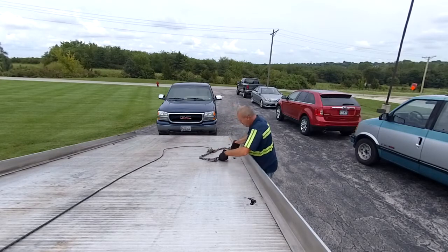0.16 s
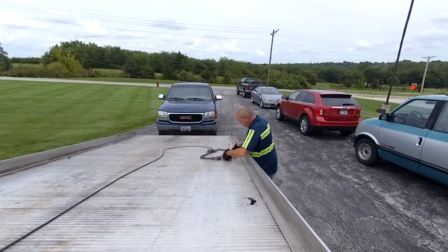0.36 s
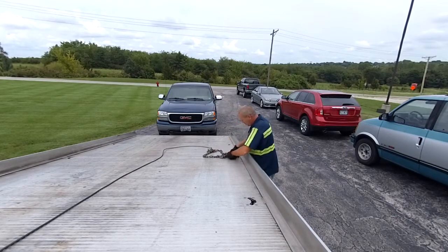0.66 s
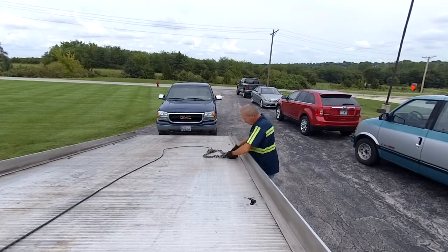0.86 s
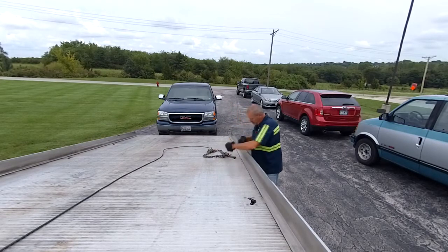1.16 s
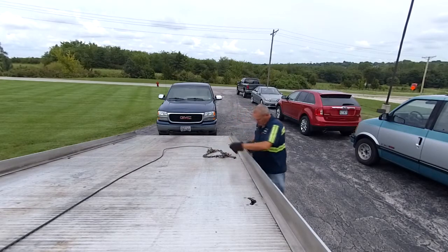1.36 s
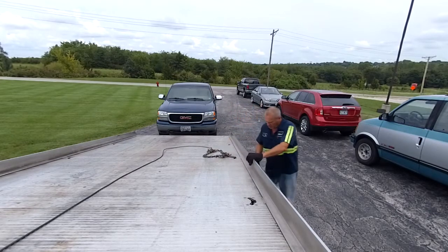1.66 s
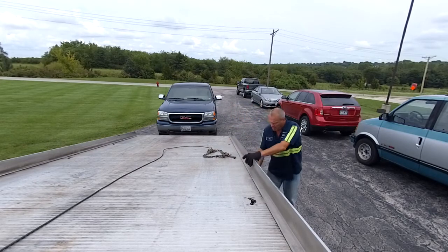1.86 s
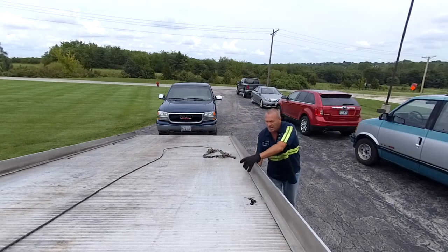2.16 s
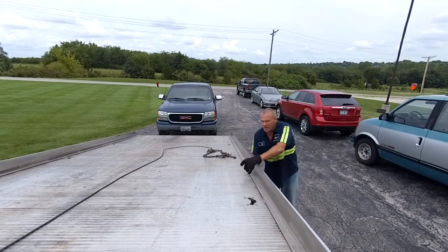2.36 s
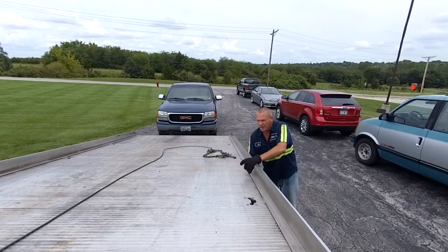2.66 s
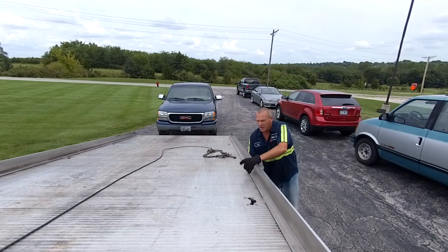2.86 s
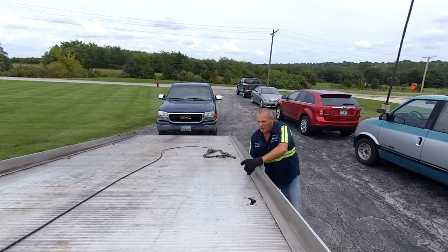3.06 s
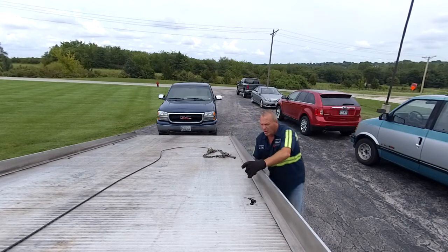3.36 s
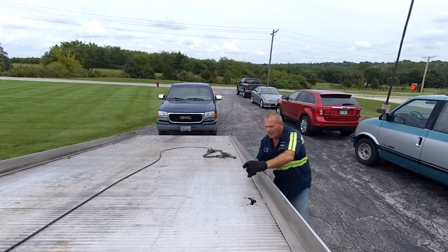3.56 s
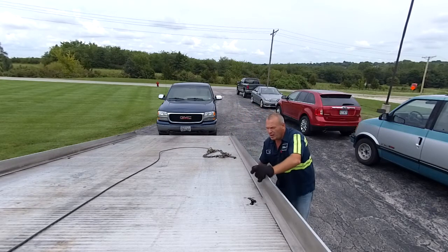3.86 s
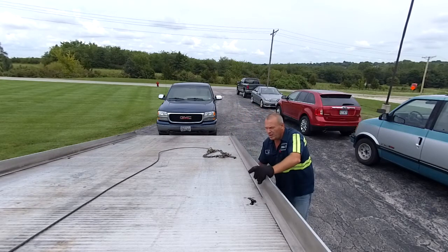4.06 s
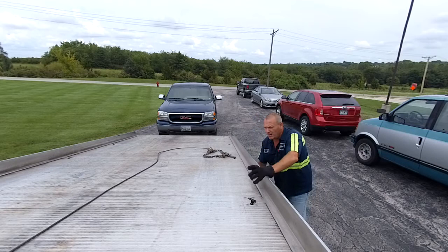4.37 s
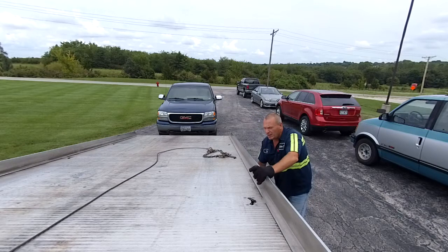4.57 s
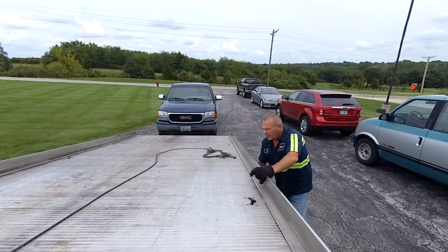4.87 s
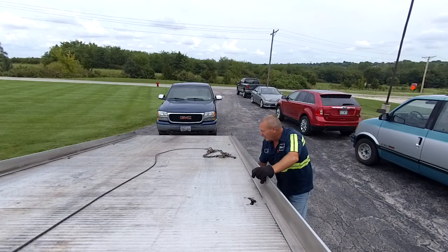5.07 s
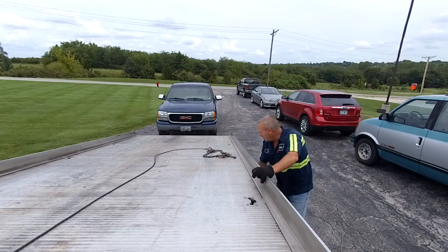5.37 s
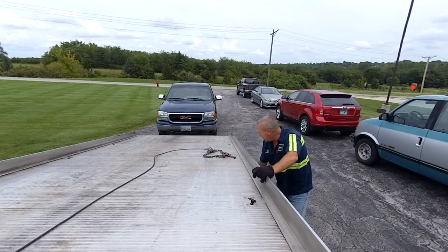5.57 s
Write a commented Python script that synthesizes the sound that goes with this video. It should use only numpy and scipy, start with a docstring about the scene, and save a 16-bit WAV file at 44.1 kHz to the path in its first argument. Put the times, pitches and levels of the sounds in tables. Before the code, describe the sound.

Chain links rattle and knock on a flatbed over a faint engine idle, before a winch pump kicks in, sags, recovers and howls harder.

```python
"""At the head of a flatbed truck's metal deck, a tow chain is dragged and dropped while the engine idles:
random contacts and single blows ring through noise-built plates, and a free link chimes on sine tones.
Soft scuffs and knocks follow beside the truck. At 2.5 s the hydraulic winch is switched in: the pump sags,
picks up speed and whines in shaft-locked tones over shaped noise for rushing oil.
From 4.1 s the cable pulls in two steps: the oil grows louder and many of the tones sing out."""
import sys
import numpy as np
from scipy import signal
from scipy.fft import rfft, irfft, next_fast_len
from scipy.io import wavfile
from scipy.ndimage import uniform_filter1d, map_coordinates

SR = 44100
rng = np.random.default_rng(int(sys.argv[2]) if len(sys.argv) > 2 else 0)


def put_to_file(sound):
    """Save the sound as 16-bit audio at rate SR, in the file named by the first command-line argument."""
    columns = np.atleast_2d(sound).T  # one column per channel
    safe = np.clip(columns, -1, 1)
    whole_steps = np.round(safe * 32767)
    wavfile.write(sys.argv[1], SR, whole_steps.astype(np.int16))


N = 251811
TIME = np.arange(N) / SR

# Links falling on the deck. Each row: time in seconds, relative knock level in dB, relative clash level in dB.
LINK_DROPS = [(.029, -47, -39), (.127, -47, -46), (.230, -32, -46), (.249, -35, -46), (.273, -35, -33.5),
              (.365, -31.5, -36), (.5, -24, -33.5), (.523, -24.5, -30), (.614, -32, -44), (0.687, -52, -39),
              (.762, -27.5, -34), (0.817, -55, -46), (.875, -42.5, -44), (1.119, -53, -47.5)]
# Tone of the struck deck. Each row: frequency in Hz, relative level in dB per Hz.
DECK_SPECTRUM = [(59, -70), (100, -49), (157, -17), (209, -19), (260, -24.5), (460, -17.5), (680, -12),
                 (830, -6), (1000, -3), (1250, -2.5), (1600, -6.5), (2600, -18), (3400, -49), (5700, -120)]
# The deck's strongest modes. Each row: frequency in Hz, width in Hz, lift in dB.
DECK_RESONANCES = [(205, 30, 6), (820, 34, 9), (907, 30, 9), (962, 30, 8), (1060, 26, 4), (1182, 30, 7),
                   (1240, 30, 7), (1395, 28, 4)]
# Tone of the rattling steel links. Each row: frequency in Hz, relative level in dB per Hz.
LINK_SPECTRUM = [(1180, -23), (2000, -13), (2690, -0.5), (2920, 2.5), (3760, -7.5), (4610, -6),
                 (5010, -13.5), (5640, -9), (6730, -17.5), (7080, -15), (7640, -13), (9360, -24.5),
                 (15000, -31)]
# The links' strongest modes. Each row: frequency in Hz, width in Hz, lift in dB.
LINK_RESONANCES = [(3110, 65, -3), (3326, 48, 10.5), (4020, 92, 8), (4530, 160, 4.5), (5480, 140, 4.5)]
BOUNCE_S, BOUNCE_LOSS_DB = 0.018, 7.5  # each falling link bounces once: delay, drop in level
KNOCK_LIFT_DB, CLASH_LIFT_DB = 13, 14.5  # added to the plate rings of each fall
JERK_DB = 1.44  # unevenness of a haul


def chain():
    """Sliding links patter on the deck, falling ones strike it and bounce; deck and steel both ring."""
    hollow_gain, scrape_gain, link_gain = hauling() * amp(JERK_DB * wobble(30))
    deck_patter = patter(DECK_SPECTRUM, DECK_RESONANCES, rate=500, t60=0.19)
    hollow, scrape = split(deck_patter, hz=1100)
    rattle = patter(LINK_SPECTRUM, LINK_RESONANCES, rate=220, t60=0.11)
    dragging = hollow_gain * hollow + scrape_gain * scrape + link_gain * rattle

    falls = np.zeros(N + SR)
    for start, knock_db, clash_db in LINK_DROPS:
        for at, loss_db in ((start, 0), (start + BOUNCE_S, BOUNCE_LOSS_DB)):
            deck_ring = amp(KNOCK_LIFT_DB) * plate(DECK_SPECTRUM, DECK_RESONANCES, t60=0.3, crack_db=2)
            knock = amp(knock_db) * (deck_ring + deck_note())
            link_ring = plate(LINK_SPECTRUM, LINK_RESONANCES, t60=0.091, crack_db=2)
            clash = amp(clash_db + CLASH_LIFT_DB) * link_ring
            falls[round(max(at, 0) * SR):][:len(knock)] += amp(-loss_db) * (knock + clash)
    return dragging + falls[:N]


# Hauls on the chain. Each row: start in seconds, end in seconds, then the levels in dB of
# hollow ring, scrape and links, before the jerks.
CHAIN_HAULS = [(-.05, 0.053, -54, -51, -56), (.125, 0.217, -55.5, -52.5, -54.5),
               (0.218, 0.497, -47.5, -43, -46.5), (0.486, 0.599, -46, -45, -47),
               (0.744, 0.846, -48.5, -51, -56.5)]
HAUL_ATTACK_S, SETTLE_DB_PER_S = 0.012, 57.5


def hauling():
    """Gains of hollow ring, scrape and links: each haul rises fast, holds, then the links settle."""
    gains = []
    for start, end, *levels in CHAIN_HAULS:
        settling_db = SETTLE_DB_PER_S * np.maximum(TIME - end, 0)
        level_db = np.array(levels)[:, None] - settling_db
        gains.append(amp(level_db) * ramp(start, HAUL_ATTACK_S))
    return np.max(gains, axis=0)


NOTE_HZ, NOTE_DB, NOTE_T60 = 967.6, -12, 0.58  # pitch, level against the knock, t60 in seconds


def deck_note():
    """The deck's longest-lived mode hangs on after one knock as a decaying sine."""
    t = np.arange(SR // 2) / SR
    envelope = amp(NOTE_DB - 60 * t / NOTE_T60) * (1 - np.exp(-t / 0.008))
    return envelope * np.sin(2 * np.pi * (NOTE_HZ * t + rng.random()))


def patter(spectrum, modes, rate, t60):
    """Dense contacts at four places, each ringing in its own way, held at an even rms of 1."""
    x = sum(ring(taps(rate, spread_db=3), plate(spectrum, modes, t60, crack_db=3.5)) for _ in range(4))
    local_power = np.abs(uniform_filter1d(x * x, size=1800))
    return x / np.sqrt(local_power + 1e-12)


# Link striking link. Each row: time in seconds, relative level in dB, ring in Hz, t60 in seconds.
LINK_CLINKS = [(.026, -52, 8050, .2), (.137, -51.5, 8150, .08), (.195, -51, 7400, .16),
               (.299, -51, 8150, .12), (.369, -39.5, 7370, 0.57), (.53, -43.5, 8020, .14),
               (.616, -40, 5830, 0.066), (.69, -43, 7540, 0.07)]


def clinks():
    """A free link rings at one high pitch while its neighbours chatter around it."""
    out, t = np.zeros(N + SR), np.arange(SR // 2) / SR
    for start, db, hz, t60 in LINK_CLINKS:
        tone = np.sin(2 * np.pi * hz * t) * amp(-60 * t / t60)
        noise = rng.standard_normal(len(t))
        chatter = unit(filtered(noise, lambda f: 1 / (1 + ((f - hz) / 280) ** 4)))
        sound = 0.68 * tone + 0.22 * chatter * amp(-60 * t / 0.062)
        attack = 1 - np.exp(-t / 0.00056)
        out[round(max(start, 0) * SR):][:len(t)] += amp(db) * sound * attack
    return out[:N]


STROKES = 6  # pump strokes per turn of the shaft
FREE_S, FREE_FADE_S = 2.82, 0.088  # the drum runs free and the surge of pressure fades


def winch():
    """One shaft drives both the whine and the spurts of oil."""
    stroke_hz = pump_speed()
    shaft_turns = np.cumsum(stroke_hz) / SR / STROKES
    surge = 1 - ramp(FREE_S, FREE_FADE_S)
    return whine(stroke_hz, shaft_turns, surge) + oil(shaft_turns, surge)


# Pump and gear tones. Each key: multiple of the shaft speed;
# each value: relative level in dB with slack cable, relative level in dB under load.
SHAFT_ORDERS = {6: (-75.5, -77.5), 12: (-73.5, -74), 13: (-78, -74.5), 26: (-74, -78), 36: (-66, -70),
                42: (-59.5, -57), 48: (-61, -56), 54: (-65, -53.5), 62: (-61, -56), 66: (-68, -61),
                72: (-73, -46.5), 78: (-51, -45.5), 84: (-54, -60), 90: (-57, -39.3), 96: (-64, -66),
                99: (-62, -44), 102: (-67, -61), 104: (-56, -49.5), 120: (-54, -58), 132: (-58, -63),
                134: (-65, -52.5), 162: (-58, -64), 168: (-61, -63), 174: (-60, -51), 192: (-68, -65),
                204: (-62, -64), 336: (-73, -65), 378: (-70, -62)}
# Housing resonances that the tones glide through. Each row: frequency in Hz, width in Hz, lift in dB.
HOUSING_RESONANCES = [(195, 9, 6), (205, 20, 5.5), (438, 16, 4), (722, 14, 10), (818, 26, 11),
                      (1415, 25, 4), (1688, 45, 5), (2075, 65, 4), (2228, 30, 8), (2295, 22, 7),
                      (3084, 30, 8), (3330, 70, 13), (3465, 70, 9)]
WHINE_DB, WHINE_LOAD_DB, WHINE_ATTACK_S = 1.5, -1.66, 0.12  # lift of all tones, its change under load
MESH_ORDER = 90  # the gear mesh howls through the surge: multiple of the shaft speed
SURGE_MESH_DB, SURGE_TONES_DB = 11, -4  # changes in the surge: mesh tone, all other tones


def whine(stroke_hz, shaft_turns, surge):
    """Tones follow the shaft, swell at housing resonances and shift with load; the surge makes them ragged."""
    load = cable_load(0)
    grid = np.arange(0, SR // 2, 2)
    housing_db = bumps_db(HOUSING_RESONANCES, grid)
    out = np.zeros(N)
    for order, (slack_db, loaded_db) in SHAFT_ORDERS.items():
        hz = order * stroke_hz / STROKES
        surge_db = SURGE_MESH_DB if order == MESH_ORDER else SURGE_TONES_DB
        db = slack_db + load * (loaded_db - slack_db)
        db = db + surge * surge_db + np.interp(hz, grid, housing_db)
        phase_jitter = (0.13 + 0.8 * surge) * wobble(70)
        phase = 2 * np.pi * (order * shaft_turns + rng.random()) + phase_jitter
        flicker_db = wobble(7) + (1.1 + 1.5 * surge) * wobble(45)
        out += amp(db + flicker_db) * np.sin(phase)
    overall = amp(WHINE_DB + WHINE_LOAD_DB * load) * ramp(ENGAGE_S, WHINE_ATTACK_S)
    return np.sqrt(2) * out * overall


# Oil in the valve; the rows are growl, rush and hiss. Each row: opening in seconds, attack in seconds,
# level in dB with slack cable, added dB under load, added dB in the surge, lag behind the load in seconds.
OIL_LAYERS = [(2.47, 0.086, -49.5, 5, 7.5, .04), (2.455, 0.12, -43.5, 1.8, 3.5, 0.074),
              (2.45, 0.19, -50, 3.5, 4.5, 0.096)]
# Tone of growl and rush together. Each row: frequency in Hz, relative level in dB per Hz.
RUSH_SPECTRUM = [(30, -58), (150, -36), (400, -28), (580, -28), (780, -6), (1350, 1), (1550, -2.5),
                 (2250, -4), (2600, -4.5), (2900, -8), (3350, -2.5), (3750, -11.5), (4050, -5), (4700, -45)]
# Tone of the hiss. Each row: frequency in Hz, relative level in dB per Hz.
HISS_SPECTRUM = [(3600, -67), (4300, -2), (4750, -1.5), (5150, -4), (6000, -2.5), (6750, 1), (7200, -8),
                 (7700, -3), (9200, -12.5), (11200, -8.5), (12000, -11), (12700, -9), (13700, -22),
                 (15500, -29)]


def oil(shaft_turns, surge):
    """Oil rushes in spurts, one a stroke and alternately strong and weak; more pressure makes it louder."""
    gains = []
    for opens, attack, slack_db, load_db, surge_db, lag in OIL_LAYERS:
        level_db = slack_db + load_db * cable_load(lag) + surge_db * surge
        gains.append(ramp(opens, attack) ** 2 * amp(level_db))
    growl_gain, rush_gain, hiss_gain = gains
    stroke = 2 * np.pi * STROKES * shaft_turns
    spurts = 1 + 0.13 * np.cos(stroke) + 0.092 * np.cos(stroke / 2)
    growl, rush = split(piped(spurts * rng.standard_normal(N), RUSH_SPECTRUM), hz=1172)
    hiss = piped(spurts * taps(rate=8000, spread_db=2.0), HISS_SPECTRUM)
    growl = amp(0.76 * wobble(16)) * growl
    hiss = amp(0.13 * wobble(16)) * hiss
    return growl_gain * growl + rush_gain * rush + hiss_gain * hiss


# Pipe resonances that the oil keeps ringing. Each row: frequency in Hz, width in Hz, lift in dB.
PIPE_RESONANCES = [(1122, 16, 5), (1305, 31, 2.5), (1445, 40, -3.5), (1737, 85, 4.5), (1796, 26, 9.5),
                   (2300, 110, 3.5), (3066, 57, 7), (3356, 78, 4), (3803, 37, -1), (6110, 40, 7),
                   (6800, 53, 10.5), (8240, 60, -5), (11140, 380, 5)]


def piped(x, spectrum):
    """Flow noise through the pipe resonances, with a faint ring of the truck's steel."""
    nearly_flat = [(20, 0), (20000, 0.0046)]
    steel = ring(x, plate(nearly_flat, [], t60=0.14, crack_db=-3.5))
    flow = x + 0.5 * steel
    return coloured(filtered(flow, lambda hz: amp(bumps_db(PIPE_RESONANCES, hz))), spectrum)


# The winch is switched in; the pump's stroke rate then sags from its start.
ENGAGE_S, START_HZ, SAG_HZ_PER_S = 2.5, 118.9, 39
# The engine stumbles at the bottom of the sag: time, width, depth.
STUMBLE_S, STUMBLE_WIDTH_S, STUMBLE_HZ = 2.925, 0.03, 5
# The governor catches it and eases it from the low rate towards the running rate.
CATCH_S, LOW_HZ, RUN_HZ, RECOVER_S, RECOVER_SHAPE = 3.01, 100.65, 107.7, 1.0, 1.25


def pump_speed():
    """Strokes a second: the rate sags as the pump engages, stumbles, then creeps towards its running value."""
    sag = START_HZ - SAG_HZ_PER_S * np.maximum(TIME - ENGAGE_S, 0)
    stumble = STUMBLE_HZ * np.exp(-0.5 * ((TIME - STUMBLE_S) / STUMBLE_WIDTH_S) ** 2)
    shortfall = np.exp(-(np.maximum(TIME - CATCH_S, 0) / RECOVER_S) ** RECOVER_SHAPE)
    recovery = RUN_HZ - (RUN_HZ - LOW_HZ) * shortfall
    return np.maximum(sag, recovery) - stumble


# The cable takes up its slack, then pulls. Each row: start in seconds, rise in seconds, added load from 0 to 1.
CABLE_PULLS = [(4.1, 0.13, 0.27), (4.785, 0.093, 0.72)]


def cable_load(lag):
    """Pull of the cable, 0-1, as felt lag seconds later."""
    return sum(share * ramp(start + lag, rise) for start, rise, share in CABLE_PULLS)


# Dull knocks and steps beside the truck. Each row: centre in seconds, level in dB, length in seconds.
STEP_EVENTS = [(0.995, -61, .014), (1.253, -72, 0.04), (1.567, -76.5, 0.12), (2.17, -75.5, .04),
               (2.982, -64.5, 0.054), (4.86, -61.5, 0.053)]
# Their low tone. Each row: frequency in Hz, relative level in dB per Hz.
THUD_SPECTRUM = [(40, -26), (130, -11), (220, -6), (550, 2.5), (900, -4), (2000, -60)]


def steps():
    """Soft, low scuffs and knocks: shaped noise under bell-shaped swells."""
    level = sum(amp(db) * np.exp(-0.5 * ((TIME - centre) / length) ** 2)
                for centre, db, length in STEP_EVENTS)
    return level * coloured(rng.standard_normal(N), THUD_SPECTRUM)


# Tone of the engine's rush. Each row: frequency in Hz, relative level in dB per Hz.
IDLE_SPECTRUM = [(15, -78), (25, -48), (228, -23.5), (298, -23.5), (471, -25.5), (511, -15), (725, -13.5),
                 (876, -6.5), (976, -11), (1280, -6.5), (1630, -15), (1760, -10.5), (2940, -10.5),
                 (3650, -18), (15600, -26)]
# Steady tones of the engine. Each row: frequency in Hz, peak level in dB before a slow wobble.
ENGINE_TONES = [(259, -91), (518, -80.5), (856, -75), (907, -84), (1037, -76), (1127, -75.5), (1265, -75),
                (1711, -78.5), (1816, -77), (1897, -80), (2154, -93), (2530, -77.5)]
IDLE_DB = -65.5  # level of the rush


def idle():
    """The idling engine, muffled by the deck: a soft rush with a few steady tones."""
    tones = np.zeros(N)
    for hz, db in ENGINE_TONES:
        gain = amp(db + wobble(6.4))
        tones += gain * np.sin(2 * np.pi * hz * TIME + 0.5 * wobble(13.0))
    rush_gain = amp(IDLE_DB + 0.22 * wobble(12))
    return tones + rush_gain * coloured(rng.standard_normal(N), IDLE_SPECTRUM)


def plate(spectrum, modes, t60, crack_db):
    """Answer of a metal body to a tap: a short crack and a dense ring, energy 1."""
    t = np.arange(SR // 2) / SR
    decay = amp(crack_db - 60 * t / 0.011) + amp(-60 * t / t60)
    dense = filtered(rng.standard_normal(len(t)), lambda hz: amp(bumps_db(modes, hz)))
    answer = coloured(dense, spectrum) * decay * (1 - np.exp(-t / 0.0012))
    # thin metal radiates little bass
    answer = signal.sosfilt(signal.butter(2, 120, "highpass", fs=SR, output="sos"), answer)
    return answer / np.linalg.norm(answer)


def ring(x, answer):
    """Play x through a body."""
    return signal.fftconvolve(x, answer)[:N]


def taps(rate, spread_db):
    """Tiny contacts at random moments, rate a second, of random size and sign, rms 1."""
    sizes = rng.choice([-1, 1], N) * amp(spread_db * np.clip(rng.standard_normal(N), -2, 2))
    return unit(sizes * (rng.random(N) < rate / SR))


def bumps_db(modes, hz):
    """Lift in dB that (Hz, width, dB) resonances give to each frequency."""
    return sum(db / (1 + np.square(np.square(2 * (hz - centre) / width))) for centre, width, db in modes)


def coloured(x, spectrum):
    """x shaped by (Hz, dB) points, at rms 1."""
    f, db = np.transpose(spectrum)
    return unit(filtered(x, lambda hz: amp(np.interp(np.log(hz + 1), np.log(f), db))))


def split(x, hz):
    """The parts of x below and above hz, each at rms 1."""
    low = filtered(x, lambda f: 1 / (1 + (f / hz) ** 20))
    return unit(low), unit(x - low)


def filtered(x, response):
    """x times a response of frequency."""
    m = next_fast_len(len(x) + SR // 4)
    return irfft(rfft(x, m) * response(np.fft.rfftfreq(m, 1 / SR)), m)[:len(x)]


def wobble(rate):
    """A smooth random curve, rate knots a second."""
    knots = rng.standard_normal(int(N * rate / SR) + 4)
    coarse = TIME[::32]
    return np.interp(TIME, coarse, map_coordinates(knots, [coarse * rate]))


def ramp(start, length):
    """Rises evenly from 0 to 1 over length seconds, beginning at start."""
    return np.clip((TIME - start) / length, 0, 1)


def amp(db):
    """Decibels to gain."""
    return 10 ** (np.asarray(db) / 20)


def unit(x):
    """Scale to rms 1."""
    return x / np.sqrt(np.mean(x ** 2) + 1e-20)


def scene():
    """Everything heard from the head of the deck."""
    return (chain() + clinks() + winch() + steps() + idle())[None]


TOP_HZ = 15750  # band limit of the microphone


def record(dry):
    """The microphone passes only what lies below its band limit."""
    return filtered(dry[0], lambda hz: hz < TOP_HZ)[None]


dry = scene()
out = record(dry)
put_to_file(out)
```